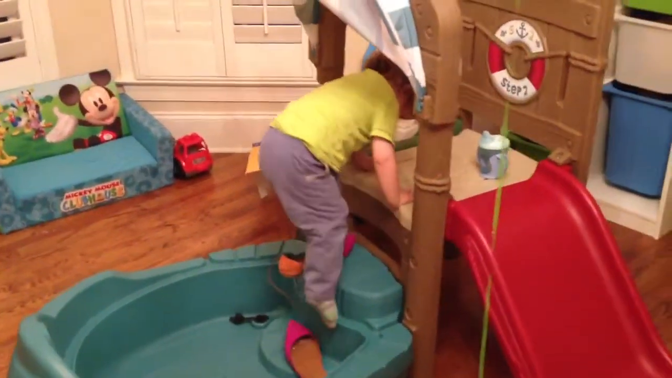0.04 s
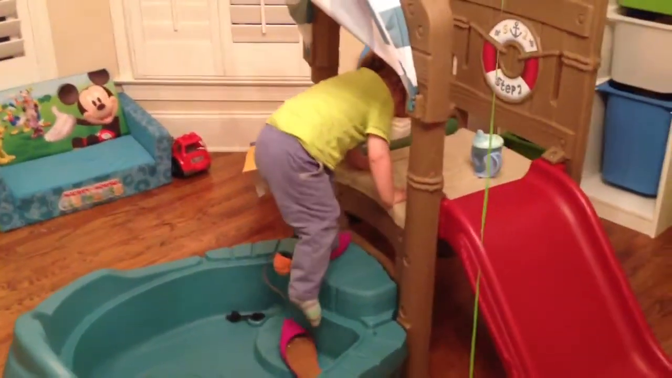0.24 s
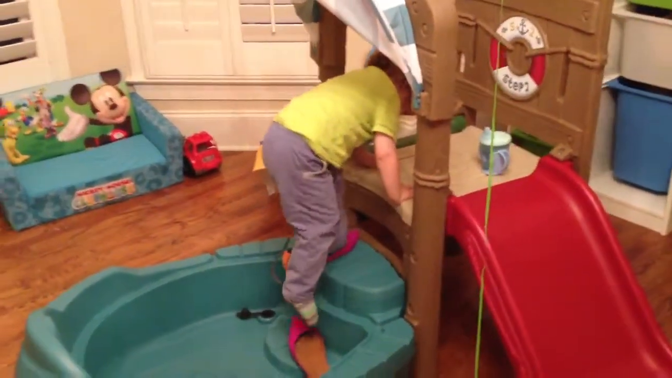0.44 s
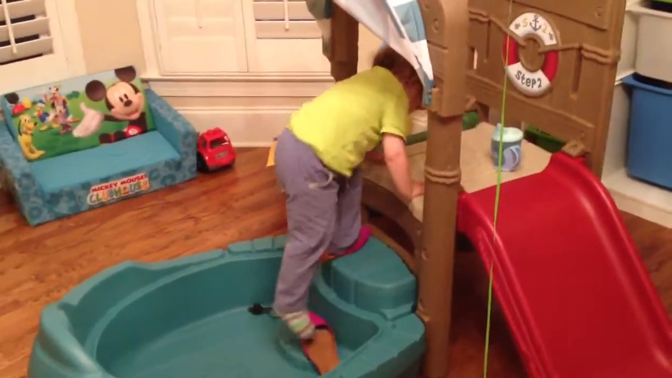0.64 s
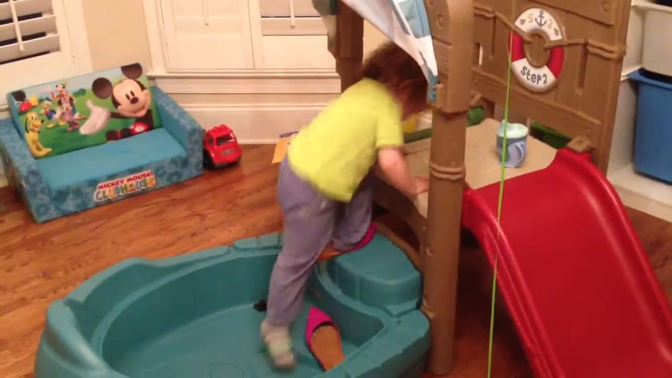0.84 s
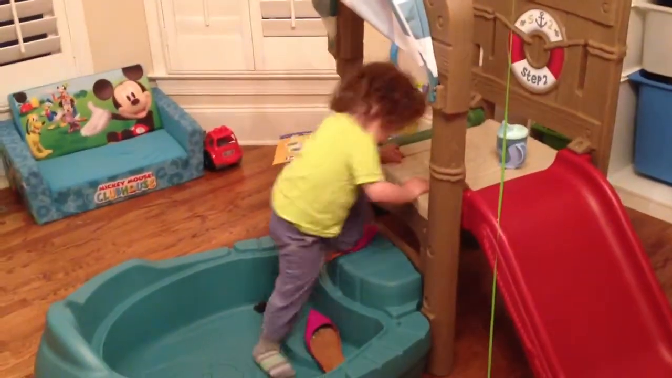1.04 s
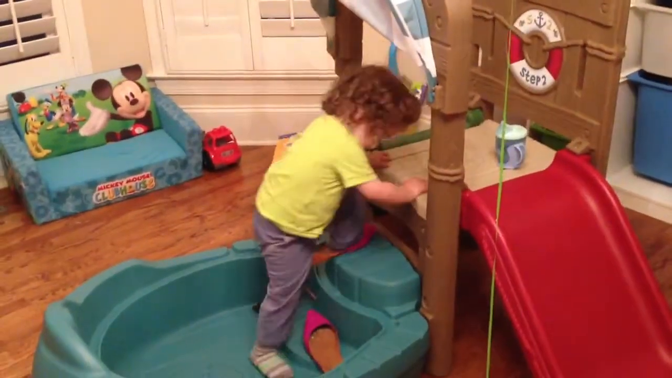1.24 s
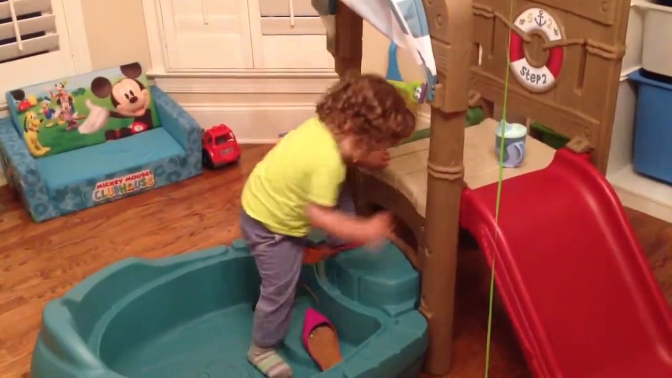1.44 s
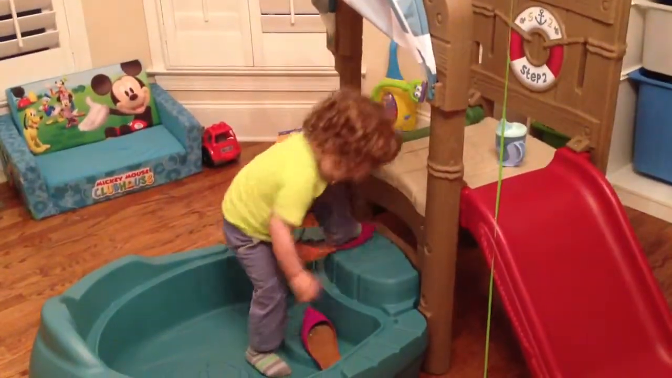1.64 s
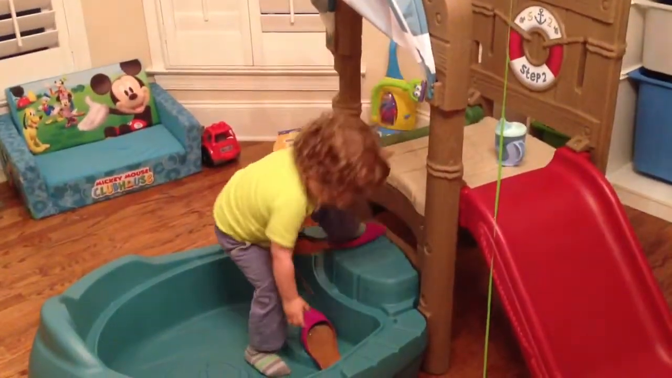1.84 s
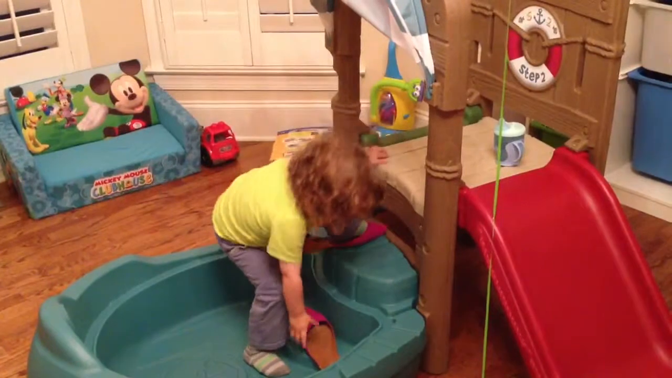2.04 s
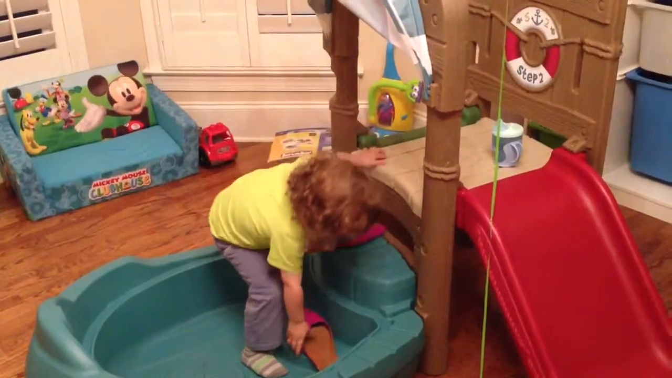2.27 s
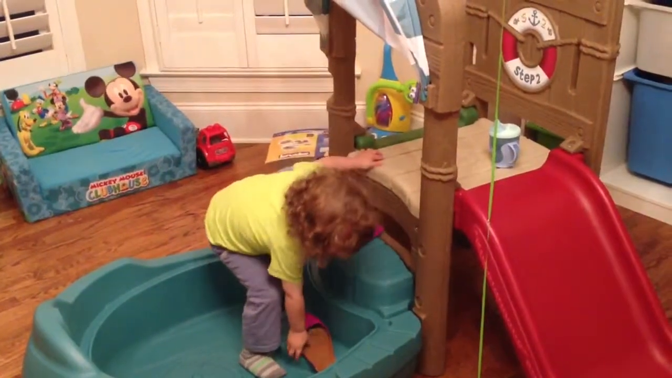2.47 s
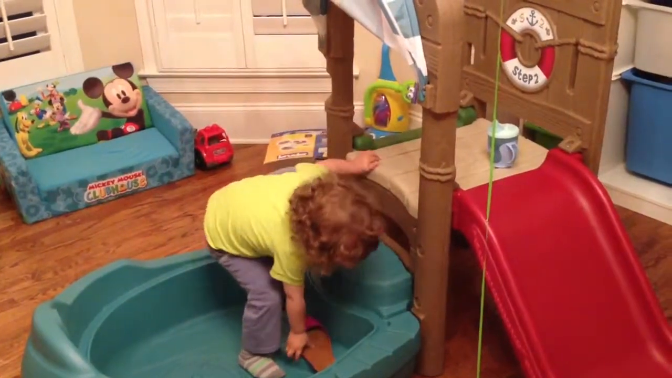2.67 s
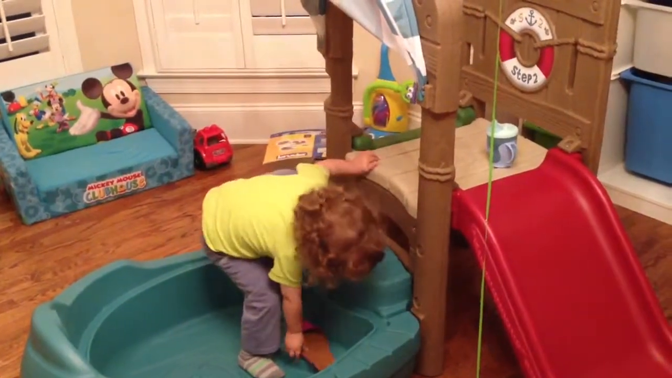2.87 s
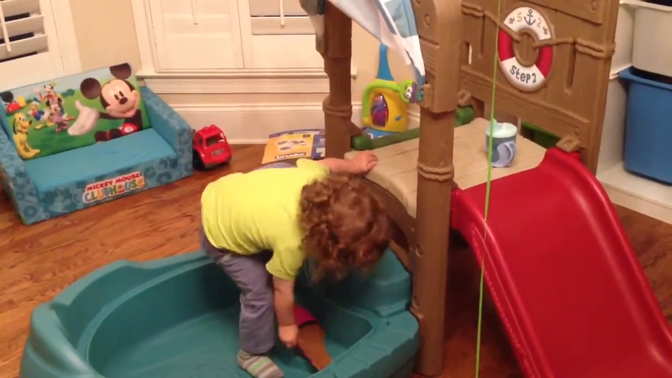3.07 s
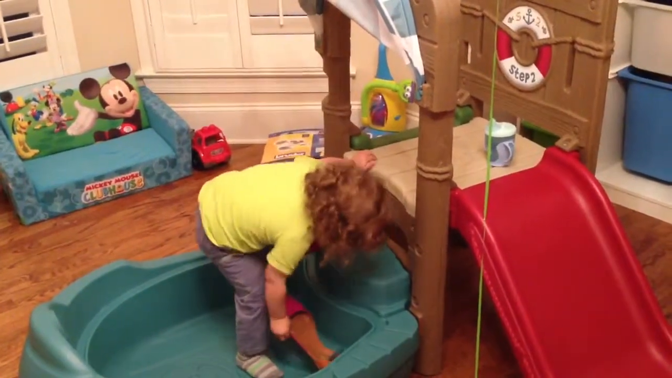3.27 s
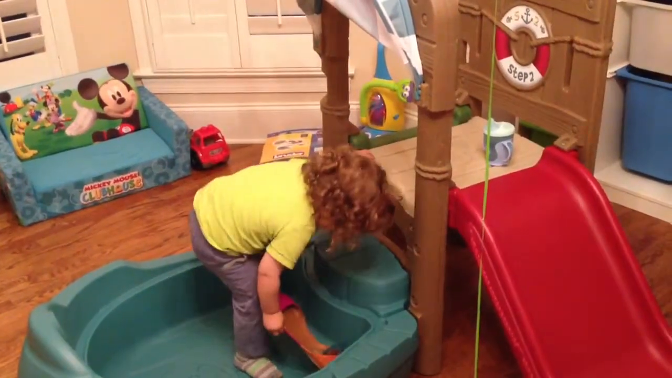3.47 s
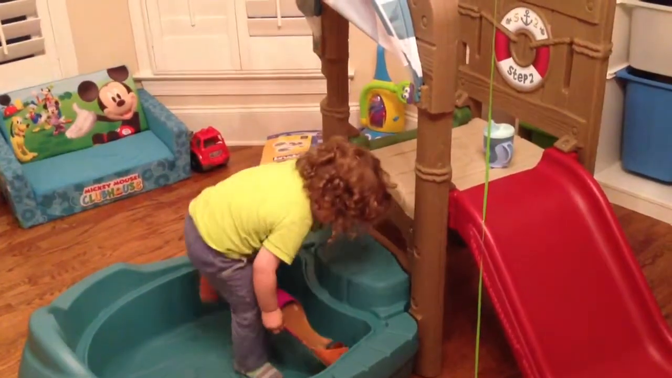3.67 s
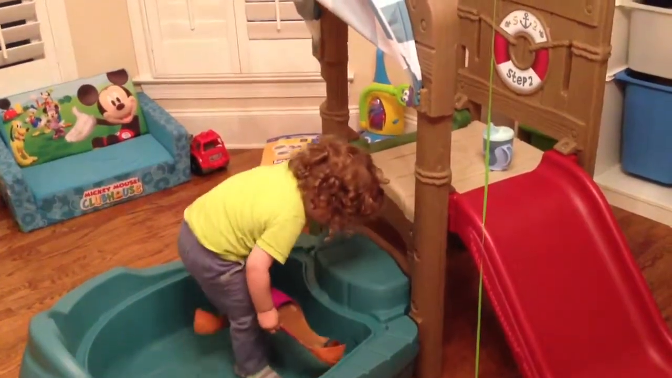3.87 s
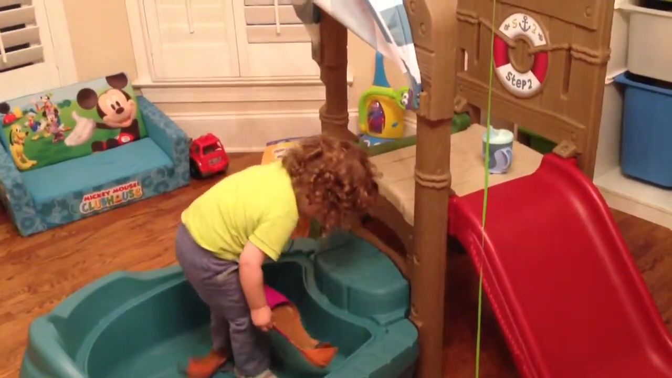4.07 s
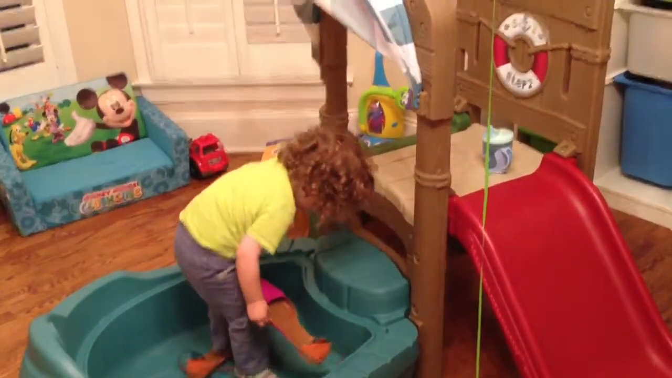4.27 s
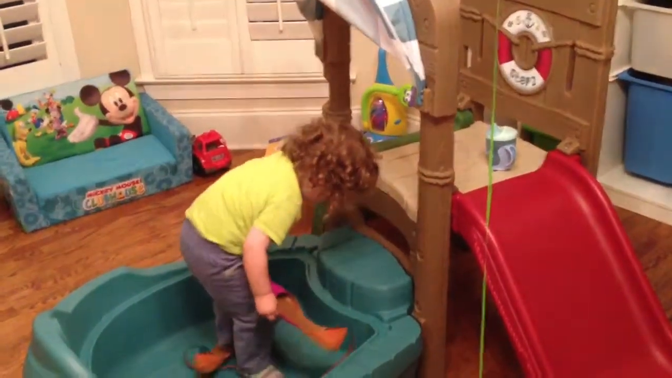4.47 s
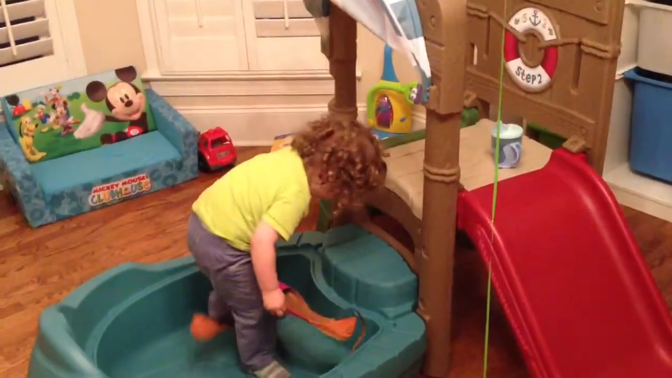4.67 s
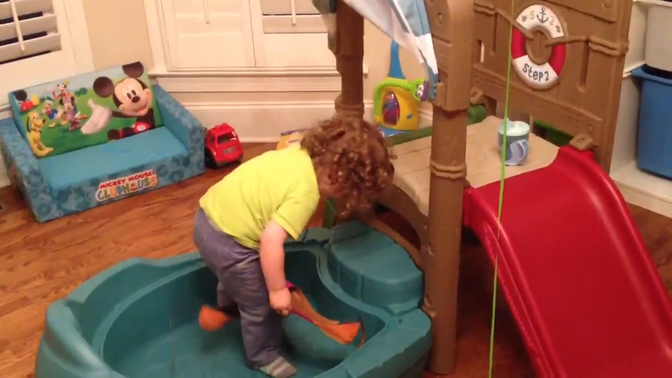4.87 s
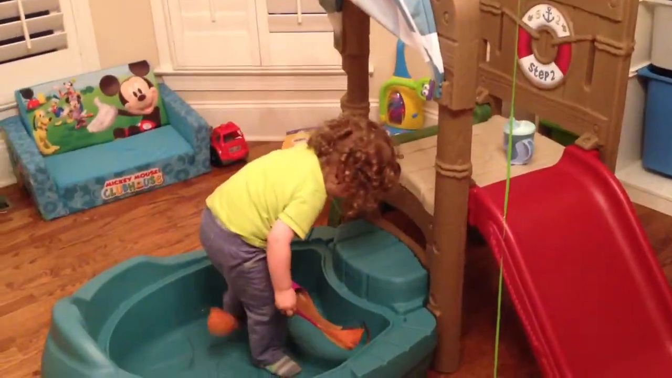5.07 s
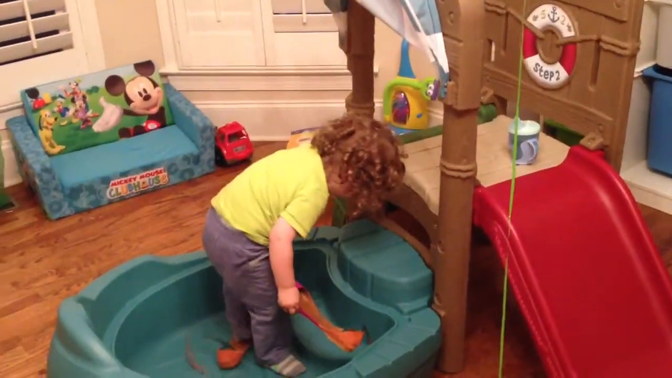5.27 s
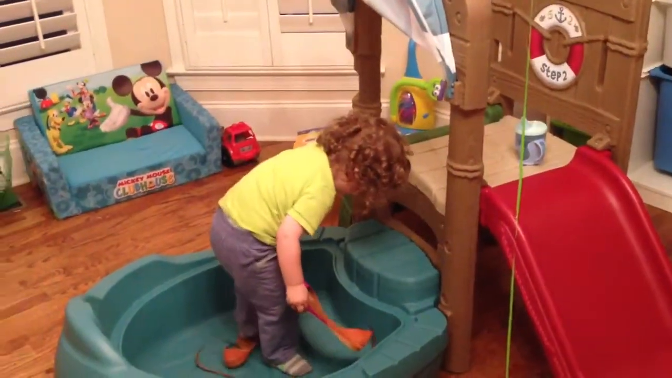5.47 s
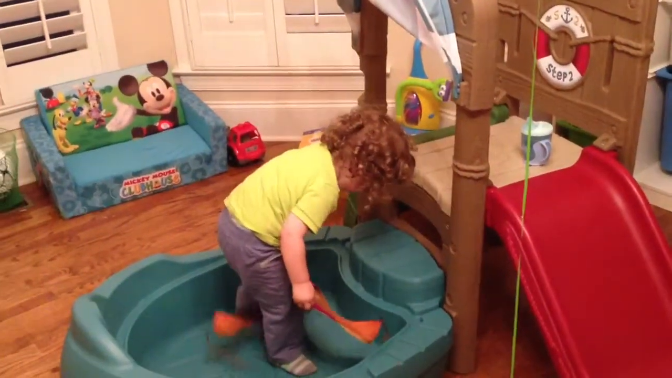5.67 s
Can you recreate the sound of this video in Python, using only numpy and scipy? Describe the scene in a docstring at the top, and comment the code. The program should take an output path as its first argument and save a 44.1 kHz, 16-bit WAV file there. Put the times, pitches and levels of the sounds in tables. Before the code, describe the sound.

A quiet indoor room with faint air noise and a low wavering hum. At about one second a hard shoe knocks the hollow plastic sandbox, followed by a small squeak and soft rubbing of skin and socks. After a near-silent stretch with faint thuds, a double knock comes at four seconds, then a much louder hard clack past five, ringing in the room. Small, thin-sounding microphone with no deep bass.

```python
"""Hard toy shoes knock on the hollow plastic sandbox in which a small child climbs about, toe first, then heel.
Each knock is a noise click plus the shell's answer: dense noise, decaying sine modes and a room tail.
Sliding skin and cloth are grainy noise, squeaks narrow noise bands, soft thuds the shell without a click.
Under it all lies the wooden-floored room: faint shaped air noise and a wavering hum of sines."""
import sys
import numpy as np
from scipy import signal
from scipy.fft import rfft, irfft, next_fast_len
from scipy.io import wavfile
from scipy.ndimage import map_coordinates

SR = 44100
rng = np.random.default_rng(int(sys.argv[2]) if len(sys.argv) > 2 else 0)


def materialize(psi):
    """Save the field psi as 16-bit PCM at rate SR to the path in sys.argv[1].

    A 1-D psi becomes a single channel; in a 2-D psi each row is a channel.
    """
    bounded = np.clip(np.atleast_2d(psi).T, -1, 1)
    quanta = np.round(bounded * 32767).astype(np.int16)
    wavfile.write(sys.argv[1], SR, quanta)


N = 251811  # length in samples


def amp(db):
    """Definition of level: 20 dB is a factor of ten in amplitude."""
    return 10 ** (np.asarray(db) / 20)


def unit(x):
    """Normalisation to an rms of 1."""
    return x / np.sqrt(np.mean(x ** 2) + 1e-20)


def along(points, hz):
    """Linear interpolation of (f/Hz, value) points on a logarithmic frequency axis."""
    f, v = np.transpose(points)
    return np.interp(np.log(hz + 1), np.log(f + 1), v)


def wobble(rate, size):
    """Slow random modulation: a smooth curve through `rate` random knots a second."""
    knots = rng.standard_normal(int(size * rate / SR) + 4)
    return map_coordinates(knots, [1 + np.arange(size) * rate / SR])


def filtered(x, response):
    """Linear filtering: the spectrum of x times a response of frequency."""
    size = x.shape[-1]
    m = next_fast_len(size + SR // 4)  # padding keeps the end from wrapping onto the start
    spectrum = rfft(x, m) * response(np.fft.rfftfreq(m, 1 / SR))
    return irfft(spectrum, m)[..., :size]


def noise(spectrum, size):
    """Spectral shaping of white noise, brought to an rms of 1."""
    m = next_fast_len(size)
    shape = amp(along(spectrum, np.fft.rfftfreq(m, 1 / SR)))
    shaped = irfft(rfft(rng.standard_normal(m)) * shape, m)
    return unit(shaped[:size])


def add(track, s, sound):
    """Superposition: mix a sound into the track at s seconds."""
    part = track[round(s * SR):][:len(sound)]
    part += sound[:len(part)]


# air noise of the room: f/Hz, relative spectral level/dB
AIR_SPECTRUM = [(30, -36), (70, -18), (105, -13.5), (145, 0.5), (220, -3), (340, -4), (400, -7),
                (500, -9.5), (950, -14), (1400, -18), (2400, -23.5), (7500, -27.5), (15000, -23)]
# household hum: f/Hz, level/dB (about which it wavers)
HUM_TONES = [(156, -79.5), (188, -77.5), (221, -75), (377, -70)]


def room_tone(air_db=-63, drift_rad=0.59, flutter_db=2):
    """Stationary background: broadband air noise, and hum tones modulated in amplitude and phase."""
    t = np.arange(N) / SR
    hum = np.zeros(N)
    for hz, db in HUM_TONES:
        level = np.sqrt(2) * amp(db + flutter_db * wobble(4.3, N))  # sqrt(2): from rms to peak
        hum += level * np.sin(2 * np.pi * hz * t + drift_rad * wobble(7, N))
    return amp(air_db) * noise(AIR_SPECTRUM, N) + hum


RUB_RELEASE_T60_S = 0.53  # a slide comes to rest
RUB_ROOM_DB, RUB_ROOM_T60_S = -5, 1.9  # a long faint room tail that lingers after each slide


def stroke(length, swell):
    """Envelope of sliding motion: it accelerates, holds and stops; a long faint room tail lingers after."""
    t = np.arange(SR) / SR
    after = np.maximum(t - length, 0)
    stop = amp(-60 * after / RUB_RELEASE_T60_S)
    lingering = amp(RUB_ROOM_DB - 60 * after / RUB_ROOM_T60_S)
    return np.minimum(t / swell, 1) ** 2 * np.maximum(stop, lingering)


# skin on plastic: f/Hz, relative spectral level/dB
SCRAPE_SPECTRUM = [(100, -28), (400, -6.5), (1000, 5), (1400, 2), (2100, 0), (2900, -9), (5000, -11.5)]
# cloth on plastic: f/Hz, relative spectral level/dB
CLOTH_SPECTRUM = [(500, -16), (2000, 0), (3300, 0.5), (4700, 1.5), (5600, -6), (8500, -9), (11500, -9),
                  (15000, -51)]
# the shell under a load: f/Hz, relative spectral level/dB
LOAD_SPECTRUM = [(50, -36), (110, -14), (170, 1), (300, -5.5), (600, -12.5), (2000, -56)]
# skin and socks sliding on the shell: start t/s, length t/s, swell t/s, level/dB,
# cloth hiss level/dB over that level, weight on the shell level/dB over that level (before rumble_db)
SLIDES = [(0.619, 0.47, 0.28, -72, 3, 9.5), (1.02, 0.2, 0.048, -58.5, -9, -2),
          (1.2, 0.14, 0.088, -62, -6, -0.5), (1.65, 0.085, 0.072, -55.5, -4, 1.5),
          (1.8, 0.13, 0.062, -59, -3, 3), (2.789, 0.18, 0.077, -64.5, -4, 4.5),
          (2.901, 0.25, 0.11, -57, -4.5, 2.5), (3.32, 0.15, 0.1, -59.5, -7, 4.5)]


def rubbing(rumble_db=-3, grain_db=2, grain_rate=300, pressure_db=1, pressure_rate=18):
    """Stick-slip friction: skin and cloth catch in fine grains; the shell rumbles under the shifting weight."""
    track = np.zeros(N)
    for s, length, swell, db, cloth_db, weight_db in SLIDES:
        grains = amp(grain_db * wobble(grain_rate, SR))
        skin = unit(grains * noise(SCRAPE_SPECTRUM, SR))
        cloth = amp(cloth_db) * unit(grains * noise(CLOTH_SPECTRUM, SR))
        rumble = amp(rumble_db + weight_db) * noise(LOAD_SPECTRUM, SR)
        add(track, s, amp(db) * stroke(length, swell) * (skin + cloth + rumble))
    return track * amp(pressure_db * wobble(pressure_rate, N))


def dying(x, decay):
    """Frequency-dependent reverberation: each frequency of x dies with its own t60."""
    hz, t, z = signal.stft(x, SR, nperseg=256)
    t60 = np.maximum(along(decay, hz), .01)[:, None]
    return signal.istft(z * amp(-60 * t / t60), SR, nperseg=256)[1][:len(x)]


def mode(hz):
    """Modal vibration: one second of a steady sine; reflections blur its phase a little."""
    blur_rad = .35 * wobble(25, SR)
    cycles = hz * np.arange(SR) / SR + rng.random()
    return np.sin(2 * np.pi * cycles + blur_rad)


# dense vibration of the shell: f/Hz, relative spectral level/dB
SHELL_SPECTRUM = [(30, -45), (65, -40), (100, -10.5), (200, 2.5), (400, 0.5), (800, -1.5), (1500, -6),
                  (1950, -8.5), (2550, -11), (3200, -14.5), (5500, -21.5), (8500, -27), (12500, -26.5),
                  (15200, -36)]
# reverberation of the room: f/Hz, t60 t/s
ROOM_DECAY = [(80, 0.58), (300, 0.76), (1200, 0.92), (3500, 0.89), (7000, 0.77), (11000, 0.52), (16000, .3)]
# the tub's strongest modes: f/Hz, relative level/dB, t60 t/s
TUB_MODES = [(115, -16.5, 0.5), (257, -2.5, 0.59), (331.5, -3.5, 0.68), (391.3, 0.5, 0.53),
             (418.7, -1.5, 0.72), (426, -11.5, 0.8), (499.5, -8, 0.57), (533, -10.5, 0.7), (628, -9, 0.5),
             (619.6, -6, 0.3), (690, -11, 0.25), (743, -14, 1), (801.3, -3, 0.51), (806.7, -5.5, 0.76),
             (821, -9.5, 0.88), (864, -9.5, 0.72), (968, -12.5, 0.76), (985, -7, 0.55), (1002, -9.5, 0.65),
             (1120, -9, 0.66), (1292, -12, 0.84), (1337, -38, 0.22), (1600, -23.5, 0.56),
             (1534, -17.5, 0.94), (1572, -7, 0.39), (1634, -18.5, 0.98), (1720, -28, 0.9),
             (1689, -14, 0.32), (1785, -16, 0.8), (1824, -24, 0.81)]
# ring of the hard shoe: f/Hz, relative level/dB
SHOE_RING = [(2109, -3), (2163, 2), (2334, 7), (2380, -8), (2427, -34), (2444, 11.5), (2561, -6),
             (2595, -23), (2615, 15.5), (2656, 11)]


def shell_answer(ring_db, hardness_db, early_db=-4, early_t60=0.32, tail_db=-10, modes_db=-7,
                 shoe_db=-20, shoe_t60=0.18):
    """Impulse response of the struck tub: early clatter, room tail, and the modes of tub and shoe."""
    t = np.arange(SR) / SR
    early = amp(early_db - 60 * t / early_t60) * noise(SHELL_SPECTRUM, SR)
    tail = amp(tail_db) * dying(noise(SHELL_SPECTRUM, SR), ROOM_DECAY)
    tub = sum(amp(modes_db + db - 60 * t / t60) * mode(hz) for hz, db, t60 in TUB_MODES)
    # the harder the contact, the more the shoe itself rings
    shoe_decay = amp(shoe_db + hardness_db - 60 * t / shoe_t60)
    shoe = shoe_decay * sum(amp(db) * mode(hz) for hz, db in SHOE_RING)
    # a low ring_db weakens the modes, as a foot that stays on the plastic does
    return early + tail + amp(ring_db) * (tub + shoe)


def colour(x, boom_hz, boom_db, bright_db, bright_hz=2300, octaves=0.55):
    """Resonance and contact stiffness: boom_db weights the panel's band, bright_db the treble."""
    def response(hz):
        distance = np.log2((hz + 1) / boom_hz) / octaves
        boom = boom_db / (1 + distance ** 2)
        treble = bright_db * hz ** 2 / (hz ** 2 + bright_hz ** 2)
        return amp(boom + treble)
    return filtered(x, response)


def build_up(sound, split_hz=700, swell=0.004, attack=0.00057):
    """Bending-wave build-up: slow low waves take milliseconds to set the tub booming, treble far less."""
    t = np.arange(len(sound)) / SR
    low = filtered(sound, lambda hz: 1 / (1 + (hz / split_hz) ** 2))
    high = sound - low
    return low * (1 - np.exp(-t / swell)) + high * (1 - np.exp(-t / attack))


# the hard sole's own click: f/Hz, relative spectral level/dB
CLICK_SPECTRUM = [(100, -23), (600, -3.5), (1700, 10.5), (3800, -5), (6000, -2), (9000, -1), (15000, -10)]


def crack(t60=0.0056, echo_db=-15, first=0.0044, reach=0.038, count=6):
    """Contact click with early reflections: weaker copies of either sign from the floor and the sandbox."""
    t = np.arange(SR // 10) / SR
    click = noise(CLICK_SPECTRUM, len(t)) * amp(-60 * t / t60)
    sound = click.copy()
    delays = rng.uniform(first, reach, count)  # seconds
    signs = np.sign(rng.standard_normal(count))
    for delay, sign in zip(delays, signs):
        add(sound, delay, amp(echo_db) * sign * click)
    return sound


# hard shoes striking the shell: t/s, level/dB, boom of the struck panel f/Hz, boom level/dB,
# brightness level/dB, crack level/dB over the knock's level, ring level/dB of the modes
SHOE_KNOCKS = [(0.965, -32.5, 244, 5.5, -4, -9, -8.5), (0.979, -39, 130, 12, -15, -16, -11),
               (1.038, -46.5, 232, 3.5, -3, -13, -10), (4.068, -37.5, 1200, 3, -14.5, 8, -6.5),
               (4.083, -50.5, 1100, -22, 11.5, 0, -30), (4.1541, -32.5, 343, 5.5, -7, -3, -6.5),
               (4.168, -34.5, 214, 11, -4, -3, -7), (5.000, -53, 346, 10.5, -16, 3, -9.5),
               (5.1991, -36, 805, 6.5, 8.5, 3.5, -31), (5.2384, -24, 600, -11, 11.5, 3, -22),
               (5.2399, -13.5, 302, -0.5, -1, 3.5, -2.5)]


def knocks(dull_hz=4500):
    """Impact excitation: each contact clicks and shakes the shell; a softer one gives a duller click."""
    track = np.zeros(N)
    for s, db, boom_hz, boom_db, bright_db, crack_db, ring_db in SHOE_KNOCKS:
        body = colour(shell_answer(ring_db, bright_db), boom_hz, boom_db, bright_db)
        click = colour(crack(), boom_hz, boom_db, bright_db, bright_hz=dull_hz)
        add(track, s, amp(db) * build_up(body))
        add(track, s, amp(db + crack_db) * click)
    return track


# short squeaks of a sole on plastic: t/s, level/dB, pitch f/Hz, t60 t/s of the fade in the room
SOLE_SQUEAKS = [(1.198, -49, 1180, 0.51), (2.649, -57, 1390, 0.78)]


def squeaks(width=0.16, slip_t60=0.054, room_db=-5):
    """Slip friction: a sole slips for an instant, a rough, narrow band that then fades in the room."""
    track = np.zeros(N)
    t = np.arange(SR // 2) / SR
    for s, db, hz, t60 in SOLE_SQUEAKS:
        band = [(hz / 4, -30), (hz * (1 - 2 * width), -10), (hz * (1 - width), 0),
                (hz * (1 + width), 0), (hz * (1 + 2 * width), -12), (hz * 6, -35)]
        fade = amp(-60 * t / slip_t60) + amp(room_db - 60 * t / t60)
        add(track, s, amp(db) * fade * noise(band, len(t)))
    return track


# soft thuds of a foot on the shell: t/s, level/dB, boom of the panel underfoot f/Hz, boom level/dB
FOOT_THUDS = [(1.372, -59, 220.5, 19), (2.472, -61.5, 278, 15.5), (2.877, -53.5, 283, 11),
              (3.452, -51, 173, 20), (3.853, -63, 208, 17), (4.17, -41, 93, 25), (5.022, -58, 167, 22)]
THUD_BRIGHT_DB, THUD_RING_DB = -28, -3  # every soft foot: little treble, slightly weakened modes


def thuds():
    """Soft impact: a foot in a sock sets the shell booming without any click."""
    track = np.zeros(N)
    for s, db, boom_hz, boom_db in FOOT_THUDS:
        answer = shell_answer(THUD_RING_DB, THUD_BRIGHT_DB)
        body = colour(answer, boom_hz, boom_db, THUD_BRIGHT_DB)
        add(track, s, amp(db) * build_up(body))
    return track


def scene():
    """Superposition of shoes, feet and cloth on the tub over the tone of the room."""
    return (room_tone() + rubbing() + knocks() + squeaks() + thuds())[None]


# notch of the microphone port: f/Hz, level/dB
PORT_NOTCH = [(8500, 0), (9900, -6.5), (12000, -4.5)]
TOP_HZ = 15400  # band limit


def record(dry, low_cut_hz=72):
    """Band-limited transduction by a small microphone: no deep bass, a port notch, nothing above TOP_HZ."""
    high_pass = signal.butter(N=3, Wn=low_cut_hz, btype='high', fs=SR, output='sos')
    thin = signal.sosfilt(high_pass, dry)
    return filtered(thin, lambda hz: amp(along(PORT_NOTCH, hz)) * (hz < TOP_HZ))


dry = scene()
out = record(dry)
materialize(out)
```